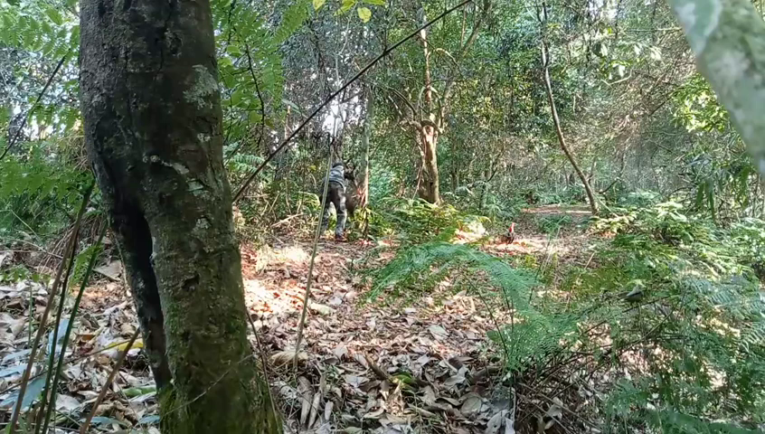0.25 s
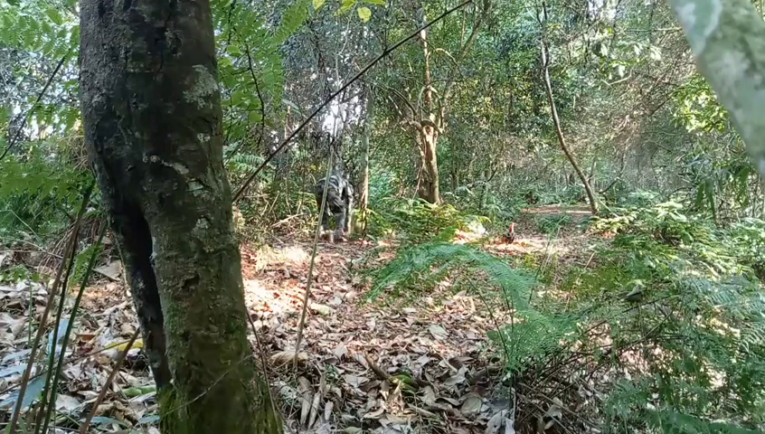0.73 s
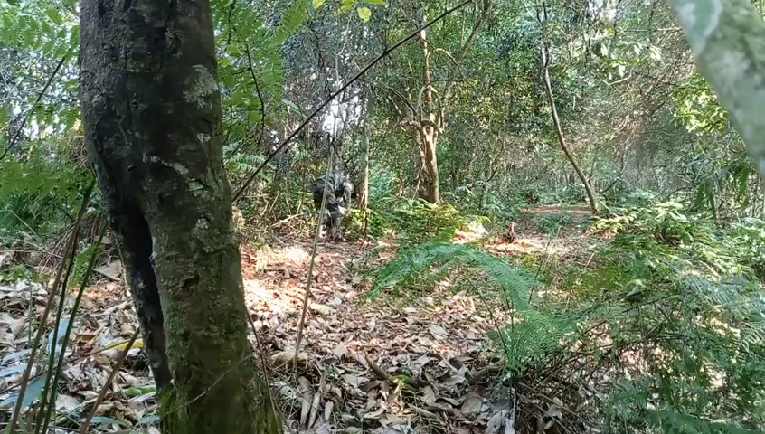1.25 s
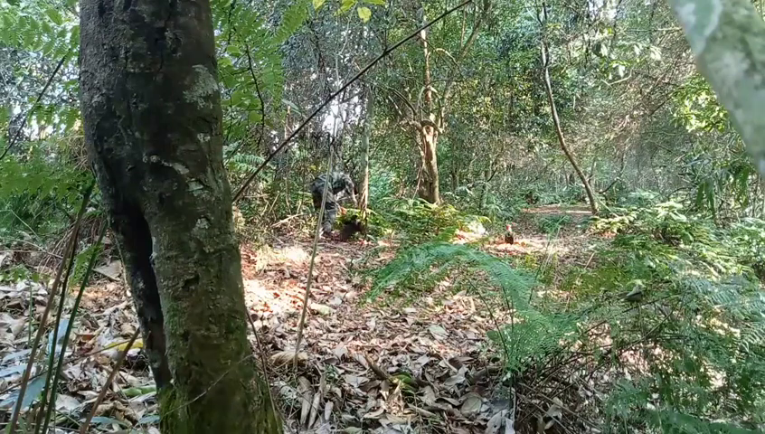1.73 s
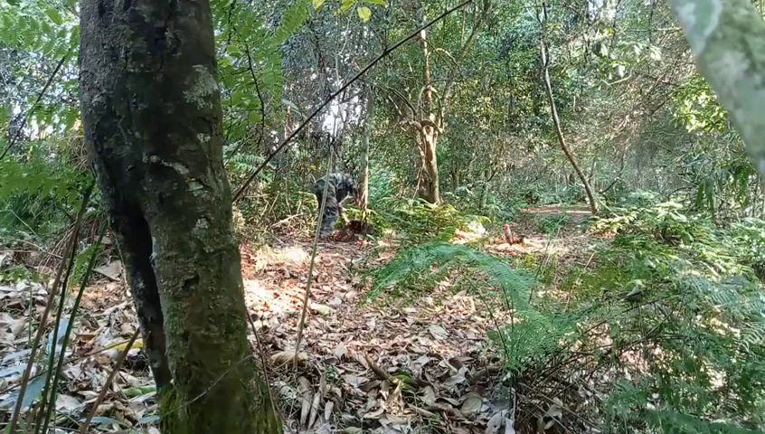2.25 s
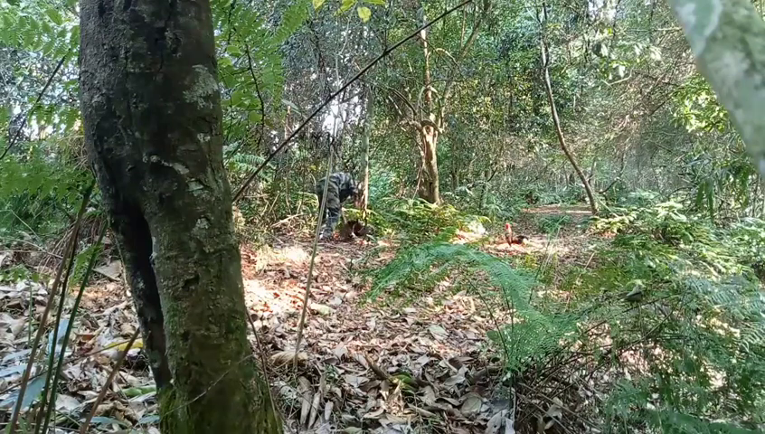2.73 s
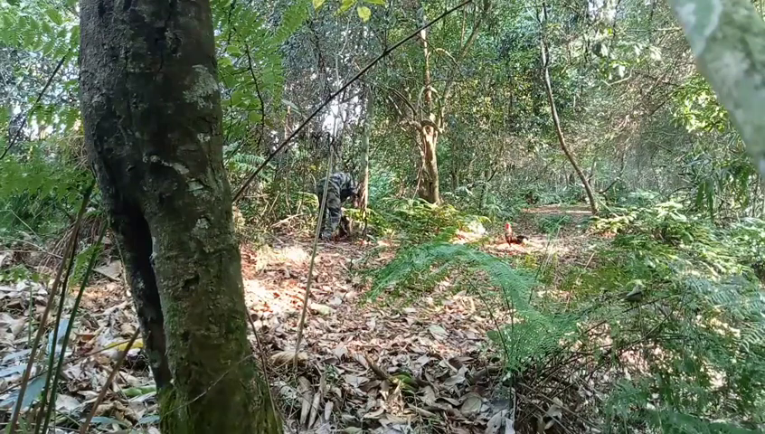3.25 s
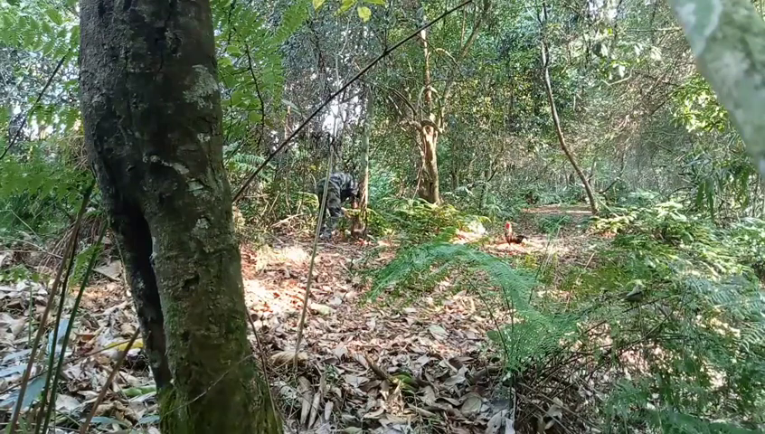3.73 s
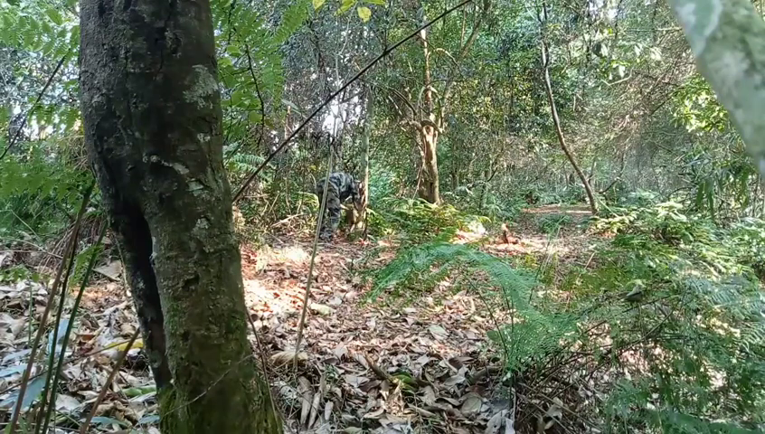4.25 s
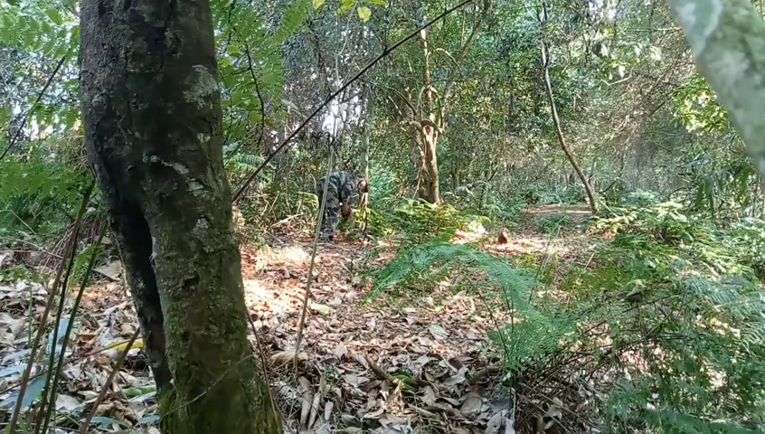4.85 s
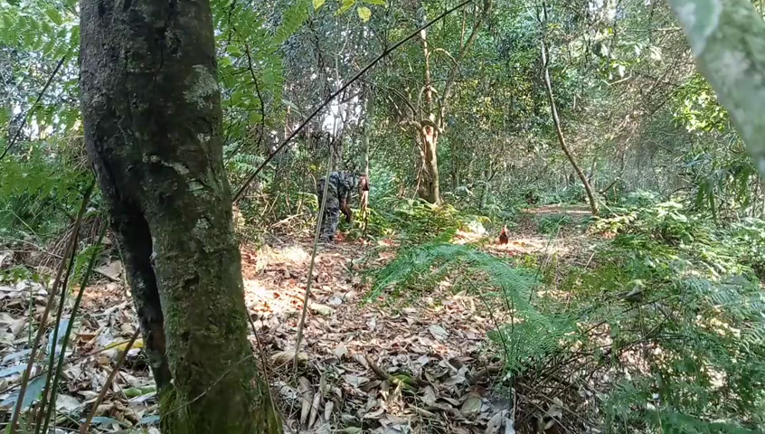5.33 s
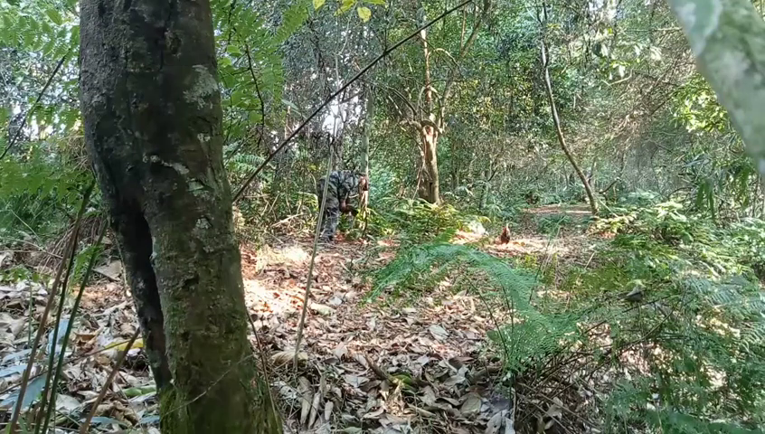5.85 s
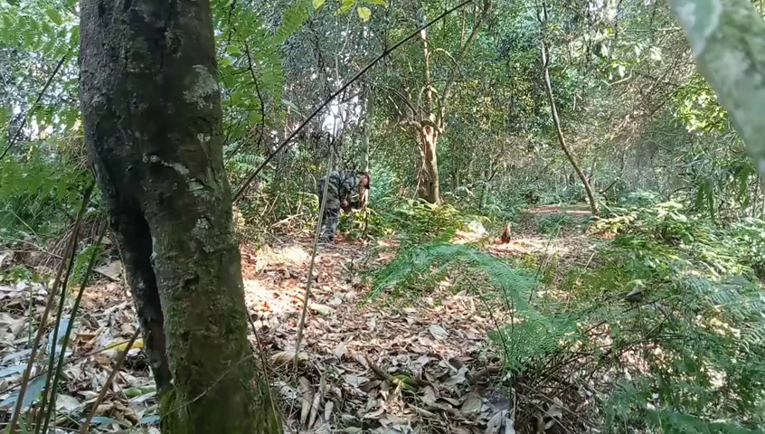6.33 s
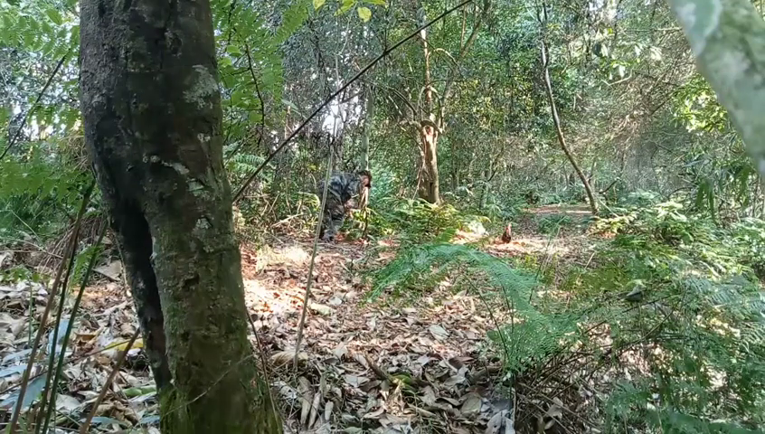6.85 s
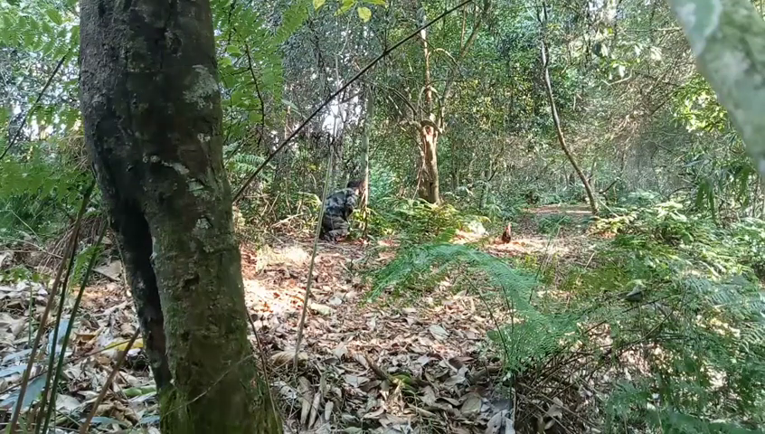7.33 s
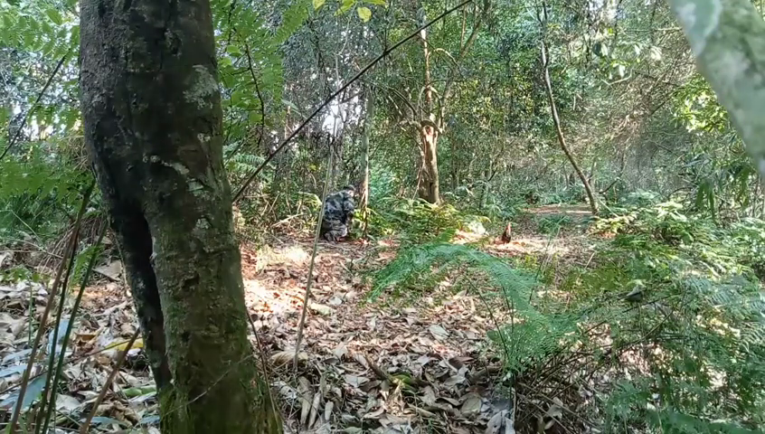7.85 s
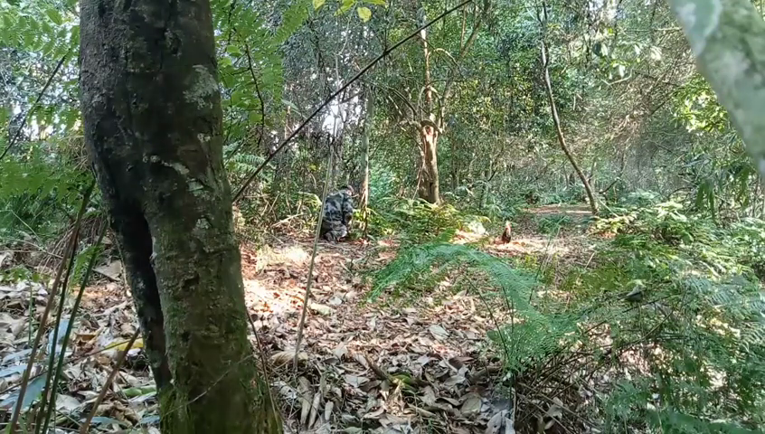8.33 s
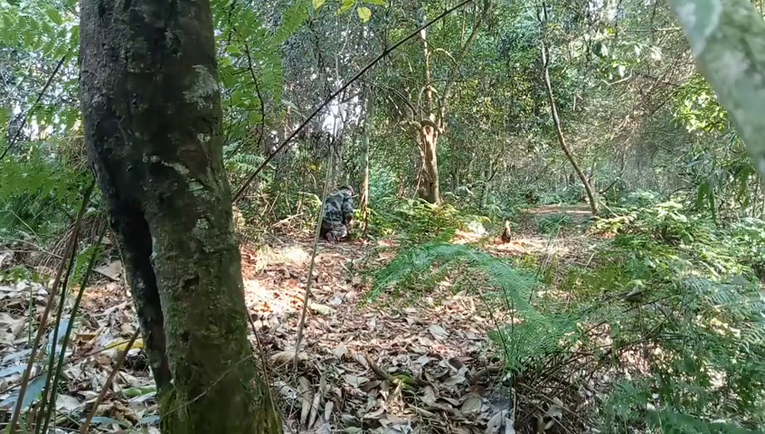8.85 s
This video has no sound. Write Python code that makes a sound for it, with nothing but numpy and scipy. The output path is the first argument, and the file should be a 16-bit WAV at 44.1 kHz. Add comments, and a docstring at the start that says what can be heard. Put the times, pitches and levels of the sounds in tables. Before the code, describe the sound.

A chicken clucks rapidly while another gives five hoarse whines breaking into loud squawks, with footsteps crackling in dry forest leaves.

```python
"""In a forest, two chickens call while dry leaves crackle and thud underfoot. One clucks low and fast,
nearly six times a second; the other gives five drawn-out calls, each a hoarse, swelling whine that
breaks into a loud squawk. Both voices follow the source-filter principle: pulses from the syrinx and
turbulent air excite the resonances of the throat. The tree trunks scatter everything back over a very
quiet background of air."""
import sys
import numpy as np
from scipy import signal
from scipy.fft import rfft, irfft, next_fast_len
from scipy.io import wavfile
from scipy.ndimage import uniform_filter1d

SR = 44100
rng = np.random.default_rng(int(sys.argv[2]) if len(sys.argv) > 2 else 0)


def to_wav(s):
    """Save 16-bit WAV."""
    ch = np.atleast_2d(s).T  # columns
    pcm = np.round(np.clip(ch, -1, 1) * 32767)  # PCM
    wavfile.write(sys.argv[1], SR, pcm.astype(np.int16))


N = 401310
TOP_HZ = 15550  # upper band limit


def undb(db):
    """Amplitude ratio of a level in decibels."""
    return 10 ** (np.asarray(db) / 20)


def unit(x):
    """Normalisation to an rms of 1."""
    return x / np.sqrt(np.mean(x ** 2) + 1e-18)


def clock(length_s):
    """Uniform sampling: seconds since the start of a sound."""
    return np.arange(int(length_s * SR)) / SR


def colour(x, spectrum):
    """Zero-phase filtering by a curve of (f/Hz, level/dB) points."""
    size = next_fast_len(len(x) + 2048)
    hz, db = np.transpose(spectrum)
    f = np.maximum(np.arange(size // 2 + 1) * SR / size, 1)
    gain = undb(np.interp(np.log(f), np.log(hz), db))
    return irfft(rfft(x, size) * gain, size)[:len(x)]


def resonate(x, hz, width_hz, stages=1):
    """Second-order resonators in cascade, with gain 1 at the centre frequency."""
    for _ in range(stages):
        x = signal.lfilter(*signal.iirpeak(hz, hz / width_hz, fs=SR), x)
    return x


def wander(size, rate):
    """Random modulation: linear interpolation between `rate` Gaussian values a second."""
    place = np.arange(size) * rate / SR
    knots = rng.standard_normal(size + 2)
    return np.interp(place, np.arange(len(knots)), knots)


def add(track, s, x):
    """Superposition: x joins the track from time s on."""
    start = int(s * SR)
    part = x[max(-start, 0):max(N - start, 0)]
    start = max(start, 0)
    track[start:start + len(part)] += part


def impacts(events, spectrum, decay_s):
    """Heavily damped impacts: noise that rises quickly and decays exponentially."""
    out = np.zeros(N)
    t = clock(0.2)
    envelope = t / decay_s * np.exp(1 - t / decay_s)
    for s, db in events:
        noise = unit(colour(rng.standard_normal(len(t)), spectrum))
        add(out, s, noise * undb(db) * envelope)
    return out


# Spectrum of still forest air: f/Hz, level/dB
AIR_SPECTRUM = [(25, -14.5), (110, -5.5), (1000, -10.5), (15000, -28)]

def still_air(db=-67.5):
    """Ambient noise: a continuous spectrum whose level wavers slightly."""
    return unit(colour(rng.standard_normal(N), AIR_SPECTRUM)) * undb(db + wander(N, 10))


# Steps in the leaf litter: t/s, crackle level/dB, thud level/dB
FOOTSTEPS = [(0.031, -44.5, -52), (0.183, -51, -68), (0.571, -47.5, -40.5), (0.809, -46, -42),
             (3.694, -50.5, -49), (3.818, -55.5, -50), (4.051, -53.5, -50.5)]
# Feet dragging through leaves: t/s, duration/s, level/dB
DRAGS = [(-.2, 1.044, -56), (0.672, 1.21, -55), (3.618, 0.56, -57.5), (3.934, 0.46, -47)]
# Spectrum of dry leaves: f/Hz, level/dB
LEAF_SPECTRUM = [(80, -6.5), (4000, -1.5), (6500, -6), (9000, -1), (11000, -9), (15000, -12.5)]

def leaves(cracks_per_s=2600, hiss=0.93, rise_s=0.0026, fade_s=0.057, drag_taper=0.39):
    """Fracture and friction: leaves crack and slide; being incoherent, steps and drags add in power."""
    power = np.zeros(N)
    t = clock(0.5)
    for s, db, _ in FOOTSTEPS:
        add(power, s, (undb(db) * np.minimum(t / rise_s, 1) * np.exp(-t / fade_s)) ** 2)
    for s, length, db in DRAGS:
        add(power, s, (undb(db) * signal.windows.tukey(int(length * SR), drag_taper)) ** 2)
    cracks = (rng.random(N) < cracks_per_s / SR) * rng.standard_normal(N)
    rustle = unit(colour(unit(cracks) + hiss * rng.standard_normal(N), LEAF_SPECTRUM))
    return rustle * np.sqrt(power) * undb(2 * wander(N, 60))


# Spectrum of a foot striking the ground: f/Hz, level/dB
THUD_SPECTRUM = [(50, -32), (100, -14), (550, -20.5), (4000, -51.5)]

def thuds():
    """Inelastic impact: each footfall gives a dead, low-pitched knock."""
    return impacts([(s, db) for s, _, db in FOOTSTEPS], THUD_SPECTRUM, decay_s=0.007)


# Runs of clucks: t/s of the first peak, duration/s, first level/dB, last level/dB
CLUCK_TRAINS = [(.112, 1.275, -43.5, -45), (2.164, .396, -52.5, -52), (2.729, 1.21, -51, -50.5),
                (4.334, 0, -35, -35), (5.085, .371, -42, -35), (6.043, 0, -44, -44), (6.4, .528, -44, -36),
                (8.047, .38, -45, -40), (8.979, 0, -46.5, -46.5)]
# Accented clucks: t/s
CLUCK_ACCENTS = [2.56, 2.73, 3.08, 6.57]

def cluck_beats(gap_s=0.177, accent_db=2, accent_stretch=1.09):
    """Periodic repetition with drifting level: (t/s, level/dB, time stretch) of every cluck."""
    beats = []
    for s, length, first_db, last_db in CLUCK_TRAINS:
        along = np.linspace(0, 1, round(length / gap_s) + 1)
        times = s + along * length
        accented = np.abs(times[:, None] - CLUCK_ACCENTS).min(axis=1) < gap_s / 2
        levels = first_db + along * (last_db - first_db) + accent_db * accented
        beats += zip(times, levels, accent_stretch ** accented)
    return beats


# Throat resonances of a cluck: f/Hz, bandwidth/Hz, relative level/dB
CLUCK_FORMANTS = [(1000, 462, -3.5), (2790, 480, -11.5), (3485, 640, -14), (4390, 270, -13.5),
                  (6000, 3200, -30), (9360, 360, -29.5)]

def clucks(pulse_hz=240, jitter=0.15, rise_s=0.02, fall_s=0.017, chest_db=-22, leak_db=-36):
    """Impulse excitation: a short train of slow pulses and puffs of air rings the throat's formants."""
    out = np.zeros(N)
    t = np.arange(-SR // 10, SR // 10) / SR
    flank_s = np.where(t < 0, rise_s, fall_s)
    puff_pole = np.exp(-1 / (0.0015 * SR))
    for s, db, stretch in cluck_beats():
        swell = np.exp(-0.5 * np.abs(t / stretch / flank_s) ** 3.8)  # a flat-topped bell
        gap_spread, pulse_db = rng.standard_normal((80, 2)).T
        onsets = (np.cumsum(np.exp(jitter * gap_spread)) * SR / pulse_hz).astype(int)
        pulses = unit(np.bincount(onsets, undb(pulse_db), len(t))[:len(t)])
        puffs = unit(signal.lfilter([1], [1, -puff_pole], pulses) * rng.standard_normal(len(t)))
        source = (pulses + puffs) * swell
        # the throat is shaped a little differently each time
        shifts = np.exp(0.046 * rng.standard_normal(len(CLUCK_FORMANTS)))
        upper_modes = sum(undb(mode_db) * resonate(source, hz * shift, width, stages=2)
                          for (hz, width, mode_db), shift in zip(CLUCK_FORMANTS[1:], shifts[1:]))
        # the main knock rings from the pulses alone
        hz, width, knock_db = CLUCK_FORMANTS[0]
        knock = resonate(resonate(pulses * swell, hz * shifts[0], width), hz, width)
        chest = resonate(source, hz=380, width_hz=550, stages=2)
        low = 2 * undb(knock_db) * knock - undb(chest_db) * chest
        high = upper_modes + undb(leak_db) * puffs * swell
        brightness = undb(np.interp(db, [-47, -41], [0.5, 5]))  # harder clucks are brighter
        add(out, s + t[0], unit(low + brightness * high) / unit(swell).max() * undb(db))
    return out


# Thin dry ticks: t/s, level/dB
DRY_TICKS = [(.188, -40.5), (8.343, -45)]
# Spectrum of a tick: f/Hz, level/dB
TICK_SPECTRUM = [(3000, -8), (13000, -18)]

def ticks():
    """Broadband transients: a few milliseconds of noise are heard as a tick."""
    return impacts(DRY_TICKS, TICK_SPECTRUM, decay_s=0.0023)


def syrinx(hz, rough, waver, rasp, alternation=0, overtone_db=0):
    """Self-sustained oscillation of membranes: when rough, their pulses stumble and leak turbulent air."""
    size = len(hz)
    rough = np.clip(rough * np.exp(0.3 * wander(size, 55)), 0, 1)
    jitter = 0.05 * rough * wander(size, 500)
    hops = waver * (0.25 + rough) * np.tanh(3 * wander(size, 55))
    phase = 2 * np.pi * np.cumsum(hz * (1 + jitter + hops)) / SR
    pulses = 0
    for k in range(1, 23):
        # as head and beak move, each harmonic swells and fades on its own
        db = 2 * wander(size, 30) if k <= 3 else overtone_db + 4 * wander(size, 30)
        windpipe_lag = k ** 2 / 2  # dispersion rounds the pulses
        pulses += undb(db) * np.cos(k * phase - windpipe_lag) * (k * hz < TOP_HZ) / np.sqrt(10)
    # period doubling: strong and weak pulses in turn add lines halfway between the harmonics
    doubling = 1 + alternation * np.cos(phase / 2 + wander(size, 90))
    shimmer = 1 + rough * wander(size, 600)
    tone = pulses * doubling * shimmer * (1 - rough ** 2)
    air = unit(colour(rng.standard_normal(size), [(1400, 0), (2400, 3), (3600, -1), (9000, -3)]))
    return tone + rasp * rough ** 1.5 * air * (1 + 0.5 * np.cos(phase))


def beak(source, throat, db, edge_s=0.0078):
    """Source-filter principle: the throat shapes the spectrum and the effort sets the level."""
    voice = colour(source, throat)
    running_rms = np.sqrt(np.abs(uniform_filter1d(voice ** 2, SR // 40)) + 1e-12)
    edges = signal.windows.tukey(len(voice), min(2 * edge_s * SR / len(voice), 1))
    return voice / running_rms * undb(db) * edges


# Throat response of the thin voice, in notes and whines: f/Hz, level/dB
THIN_THROAT = [(300, -34), (640, -29), (900, -8), (1850, -8.5), (2850, -2.5), (5000, -4), (7000, -16),
               (9300, -13), (10500, -30), (15000, -29)]
# Clear notes and squeaks: level/dB of the outer harmonics, roughness, rows of (t/s, f/Hz, level/dB)
CLEAR_NOTES = [(-10, 0.21, [(.524, 1670, -24), (.533, 1898, -34), (.539, 1823, -43), (.617, 1800, -46.5)]),
               (-4.5, .45, [(4.769, 1555, -46), (4.779, 1505, -42.5), (4.802, 1990, -47.5),
               (4.832, 2130, -49.5)]), (-5, 0.22, [(5.055, 923, -27), (5.108, 997, -31)]),
               (-13, 0.18, [(5.19, 992, -25), (5.24, 930, -26.5), (5.268, 990, -22.5),
               (5.305, 939.5, -22.5), (5.33, 905, -27.5)]), (-10, 0.033, [(5.458, 918, -23),
               (5.485, 919.5, -23), (5.533, 891, -27.5)]), (-0.5, 0.057, [(6.95, 875, -35),
               (7.1, 875, -30)])]

def notes():
    """Nearly periodic vibration: the thin voice catches briefly on a clear note or a high squeak."""
    out = np.zeros(N)
    for outer_db, rough, course in CLEAR_NOTES:
        times, hz, db = np.transpose(course)
        t = times[0] + clock(times[-1] - times[0])
        source = syrinx(np.interp(t, times, hz), rough, waver=0.024, rasp=0.77, overtone_db=-8)
        source = colour(source, [(900, outer_db), (1800, 2), (2900, 0.15), (5000, outer_db)])
        add(out, times[0], beak(source, THIN_THROAT, np.interp(t, times, db)))
    return out


# Hoarse whines: first f/Hz, last f/Hz, hollow ring level/dB, shrillness level/dB,
# rows of (t/s, level/dB, mouth resonance f/Hz, roughness)
HOARSE_WHINES = [(1021, 850, 1, 1.5, [(1.14, -59, 2540, 0.62), (1.19, -40, 3120, .6),
                 (1.29, -40.5, 2300, 0.28), (1.43, -34, 2400, 0.1), (1.49, -26, 1760, 0.35)]),
                 (887, 840, 6.5, 4, [(3.98, -51, 2450, 0.42), (4.06, -47, 2500, 0.62),
                 (4.125, -30, 2620, 0.35), (4.22, -34.5, 2540, .3), (4.335, -34.5, 1430, .55)]),
                 (971, 1300, -4, -9, [(4.88, -55, 2630, 0.54), (5.0, -35, 2940, 0.84),
                 (5.18, -26, 3300, 0.66), (5.36, -35.5, 2180, .7), (5.535, -25.5, 1880, 0.44)]),
                 (914, 820, 3.5, -7.5, [(6.25, -62.5, 1580, 0.88), (6.43, -45, 2900, 1.2),
                 (6.57, -40, 2990, 0.99), (6.78, -40, 1460, 0.79), (6.9, -38.5, 1500, 0.64),
                 (7.0, -29, 2620, 0.15)]), (1010, 800, 15.5, -3, [(7.8, -64, 2600, 0.98),
                 (8.0, -51.5, 2710, 1), (8.29, -51, 2700, 0.45), (8.44, -45.5, 1580, 0.41)])]

def whines(flutter_db=2, yield_db=-20, yield_s=0.016):
    """Irregular vibration: a hoarse, gliding tone swells, and gives way while a clear note sounds."""
    out = np.zeros(N)
    for first_hz, last_hz, hollow_db, shrill_db, course in HOARSE_WHINES:
        times, db, _, rough = np.transpose(course)
        t = times[0] + clock(times[-1] - times[0])
        hz = np.linspace(first_hz, last_hz, len(t))
        source = syrinx(hz, np.interp(t, times, rough), waver=0.05, rasp=2.04)
        source = colour(mouth(source, times[0]), [(1000, hollow_db), (2500, 0), (5500, shrill_db)])
        effort_db = np.interp(t, times, db) + flutter_db * wander(len(t), 45)
        add(out, times[0], beak(source, THIN_THROAT, effort_db))
    note_sounds = np.zeros(N)
    for *_, course in CLEAR_NOTES:
        note_sounds[int(course[0][0] * SR):int(course[-1][0] * SR)] = 1
    return out * undb(yield_db * uniform_filter1d(note_sounds, int(yield_s * SR)))


def mouth(whine, start_s, resonance_db=6, width_hz=500):
    """Time-varying formant: the mouth resonance glides over each whine, mostly sinking toward its end."""
    times, _, hz, _ = np.concatenate([course for *_, course in HOARSE_WHINES]).T
    f, t, frames = signal.stft(np.pad(whine, (0, SR // 40)), SR, nperseg=512)
    detuning = 2 * (f[:, None] - np.interp(start_s + t, times, hz)) / width_hz
    response = 1 + undb(resonance_db) / (1 + 1j * detuning)
    return signal.istft(frames * response, SR)[1][:len(whine)]


# Throat response of the full voice: f/Hz, level/dB
FULL_THROAT = [(250, -34.5), (720, -17.5), (1020, -2.5), (1500, -9.5), (2300, 0.5), (3050, -10.5),
               (3780, -1.5), (4500, -10), (5300, -31), (6500, -39), (9000, -20), (10600, -30.5),
               (15000, -38)]
# Breaks of a squawk into rasp: t/s, roughness
VOICE_BREAKS = [(1.505, 0.61), (1.639, 0.6), (1.695, 0.6), (5.555, 0.8), (7.103, .5), (7.27, 0.51),
                (8.77, 0.97)]
# Squawks: t/s, duration/s, held f/Hz, overshoot/Hz, overshoot duration/s, level/dB, sag/dB, roughness,
# pulse alternation, then level/dB of the chest, nasal ring, high ring and shrillness bands
LOUD_SQUAWKS = [(1.48, 0.24, 711, 52, 0.068, -24, 3, 0.05, 0.65, -4, 2.5, -2, 20.5),
                (4.401, 0.2, 793.6, -28, 0.054, -25, 4, 0.04, 0.1, -0.5, 2.5, 0, 15),
                (5.534, 0.29, 753.4, 37.5, 0.098, -23.5, 4.5, 0.23, 0.05, -1, 1.5, -7.5, 1.5),
                (7.014, .263, 751.5, 2, 0.13, -25, 2, 0, 0.04, -2, 0, -7.5, -7),
                (8.514, 0.27, 692, -9, 0.069, -27.5, 2.5, 0.61, 0.72, 1.5, 1.5, -6, 3)]

def squawks(scoop_s=0.036, push_s=0.021, sag_s=0.028, settle_s=0.011, collapse_s=0.03,
            creep_hz_per_s=130, break_half_s=0.02):
    """Nonlinear oscillation: the full voice scoops up, settles, doubles its period and collapses."""
    out = np.zeros(N)
    for (s, length, held_hz, over_hz, over_s, db, sag_db, held_rough, held_alternation,
         chest_db, nasal_db, ring_db, shrill_db) in LOUD_SQUAWKS:
        t = clock(length)
        scoop = np.maximum(1 - t / scoop_s, 0)
        overshoot = 0.5 - 0.5 * np.tanh((t - over_s) / settle_s / 2)
        sag = np.clip((t - scoop_s - push_s) / sag_s, 0, 1)
        collapse = np.maximum(1 - (length - t) / collapse_s, 0)
        breaks = sum(depth * np.exp(-((s + t - at) / break_half_s) ** 4) for at, depth in VOICE_BREAKS)
        hz = held_hz + over_hz * overshoot + creep_hz_per_s * (t - length / 2)
        hz *= 1 - 0.14 * scoop - 0.18 * collapse
        # the first push is the loudest and clearest part; both ends are rough
        effort_db = db - 9 * scoop ** 2 - sag_db * sag - 0.5 * breaks - collapse ** 2
        body_rough = held_rough * np.interp(sag, [0, 1], [0.34, 1])
        end_rough = 0.82 * np.sqrt(scoop) + 0.45 * np.sqrt(collapse)
        rough = np.max([body_rough, end_rough, breaks], axis=0)
        alternation = np.maximum(held_alternation * (1 - overshoot), 0.78 * breaks)
        source = syrinx(hz, rough, waver=0.005, rasp=0.9, alternation=alternation)
        second_harmonic = resonate(source, 2 * (held_hz + over_hz), held_hz / 2)
        source += undb(-1) * overshoot * second_harmonic
        # the chest carries the fundamental; a wide open beak fills the valley above the main resonances
        timbre = [(750, chest_db), (1450, nasal_db), (2200, 0), (3000, 0),
                  (3900, ring_db), (4700, 0), (6200, shrill_db), (8500, 0)]
        add(out, s, beak(colour(source, timbre), FULL_THROAT, effort_db))
    return out


def forest(x, tail_db=-10, t60_s=0.32, treble_t60_s=0.34, near_db=-8, near_s=0.014,
           ring_db=-24, ring_t60_s=0.62):
    """Multiple scattering: ground and near trunks answer at once; farther trunks blur into a tail."""
    t = clock(1)
    echoes = rng.standard_normal(SR) * rng.exponential(size=SR) * np.minimum(t / 0.045, 1)
    low = signal.sosfilt(signal.butter(1, 5000, fs=SR, output="sos"), echoes)
    high = echoes - low
    tail = low * undb(-60 * t / t60_s) + high * undb(-60 * t / treble_t60_s)
    near = rng.standard_normal(SR) * (rng.random(SR) < 900 / SR) * np.exp(-t / near_s)
    # one band rings longest
    ring = resonate(echoes, hz=1508, width_hz=330, stages=2) * undb(-60 * t / ring_t60_s)
    tail = unit(tail) + undb(ring_db) * unit(ring)
    response = (undb(tail_db) * tail + undb(near_db) * unit(near)) / np.sqrt(SR)
    return x + signal.fftconvolve(x, response)[:N]


def scene():
    """Linear superposition: leaf litter and birds reverberate among the trees, over still air."""
    air = still_air()
    sources = leaves() + thuds() + clucks() + ticks() + notes() + whines() + squawks()
    return (air + forest(sources))[None]


def record(dry, smoothing_s=0.035):
    """Downward expansion and band limiting: quiet gaps are turned down, then bottom and top are cut."""
    pole = np.exp(-1 / (smoothing_s * SR))
    power = signal.lfilter([1 - pole], [1, -pole], dry ** 2)
    level_db = 10 * np.log10(power + 1e-18)
    gain = undb(np.interp(level_db, [-64, -50], [-12, 0]))
    sound = signal.sosfilt(signal.butter(2, 60, "high", fs=SR, output="sos"), dry * gain)
    return signal.sosfilt(signal.ellip(10, 0.2, 80, TOP_HZ, fs=SR, output="sos"), sound)


dry = scene()
out = record(dry)
to_wav(out)
```